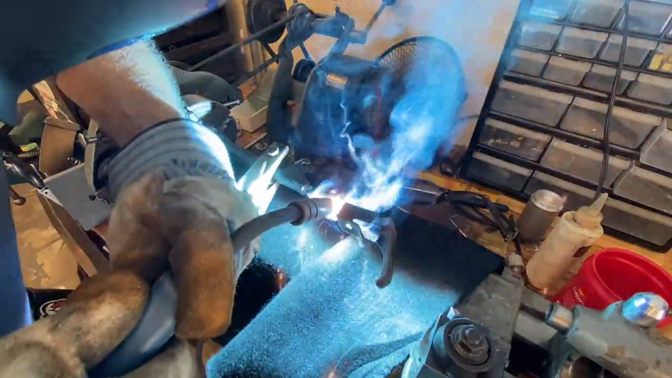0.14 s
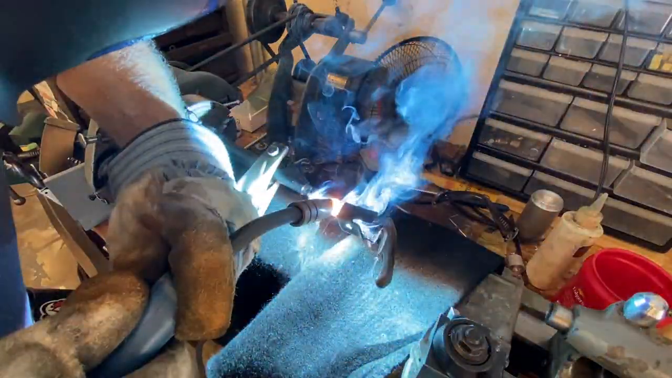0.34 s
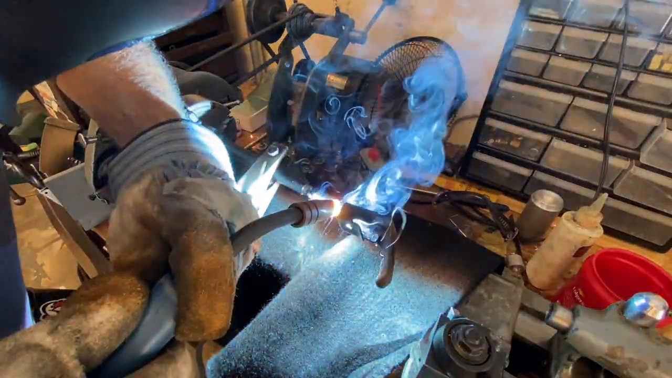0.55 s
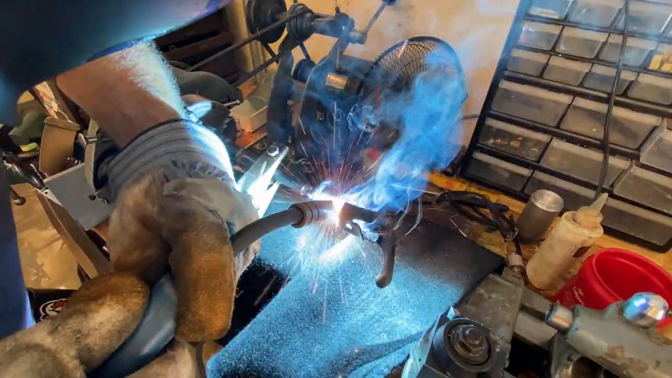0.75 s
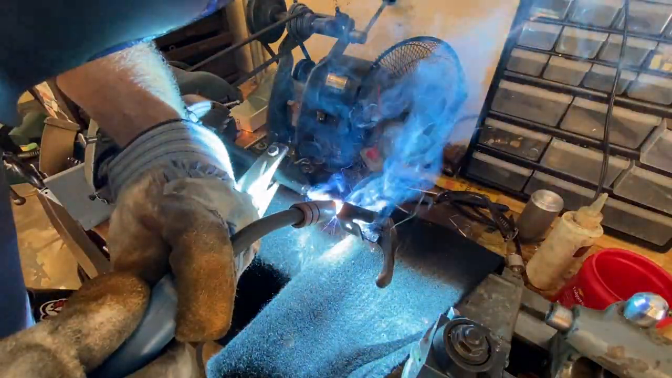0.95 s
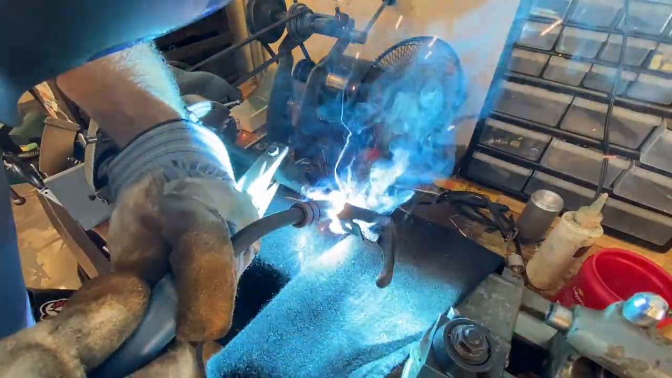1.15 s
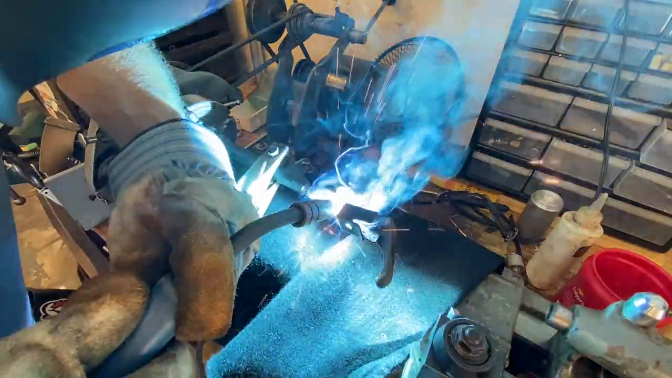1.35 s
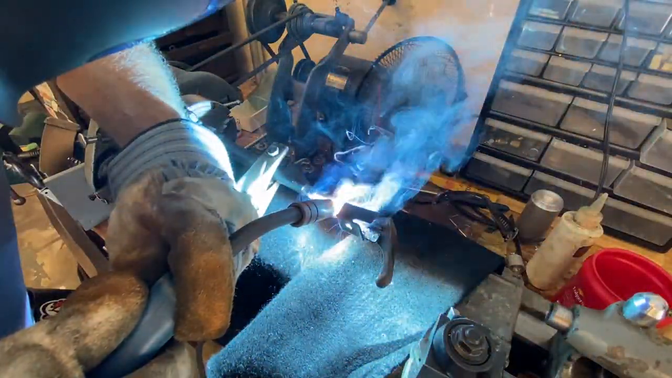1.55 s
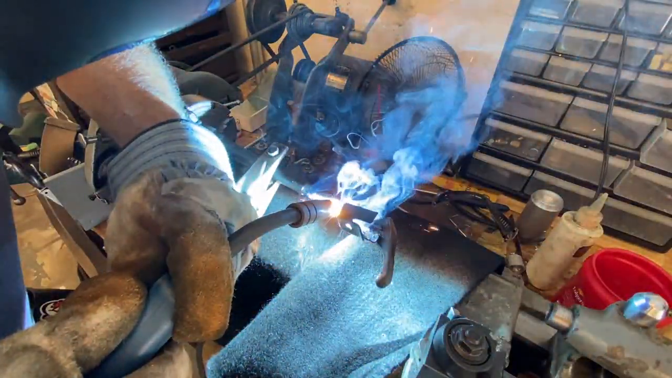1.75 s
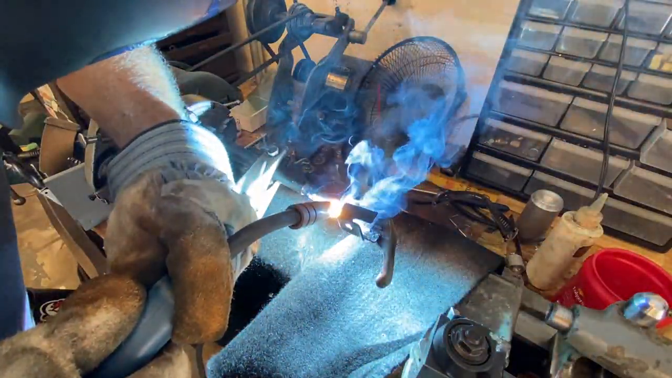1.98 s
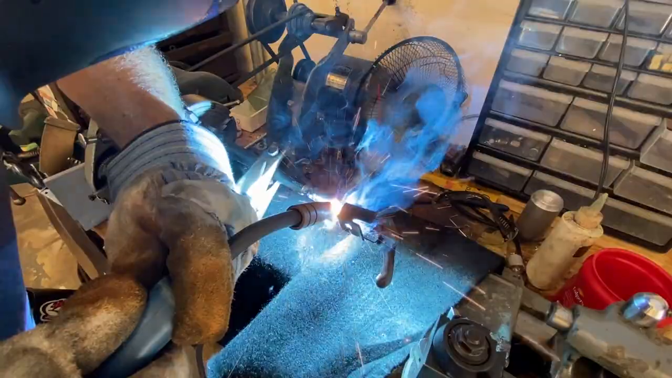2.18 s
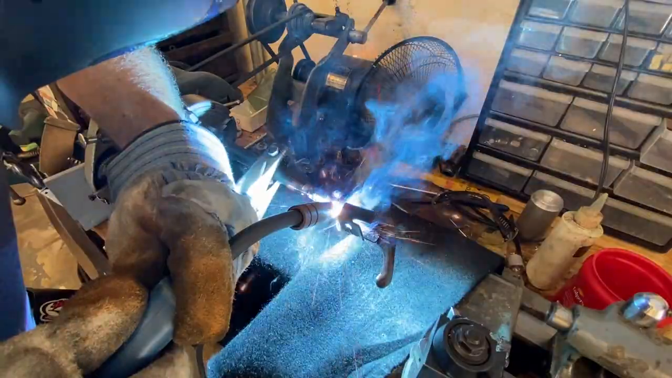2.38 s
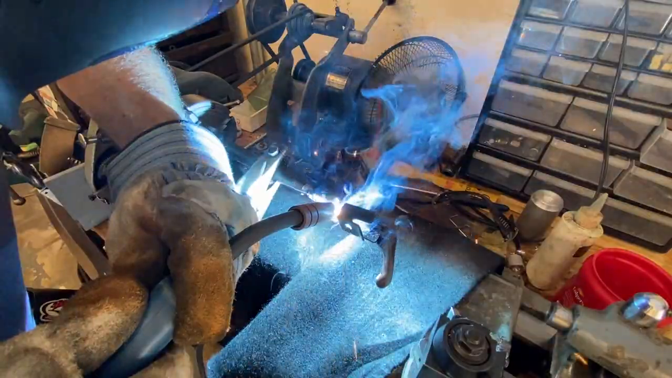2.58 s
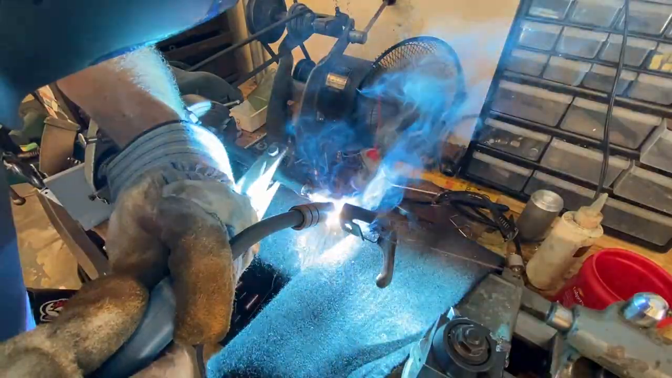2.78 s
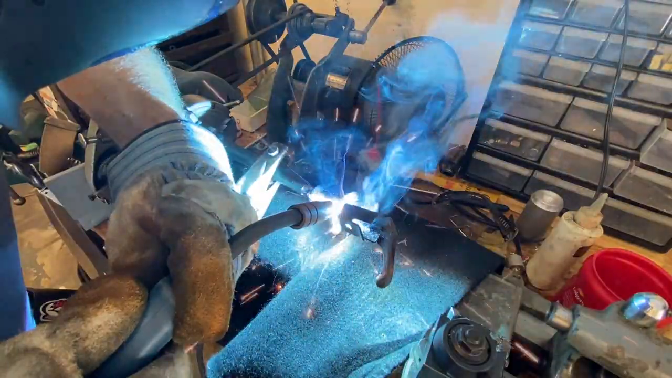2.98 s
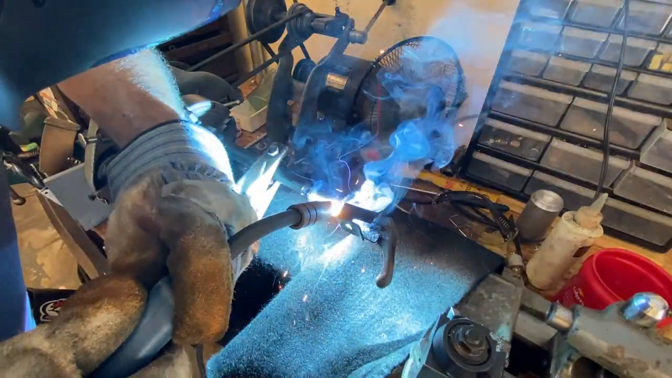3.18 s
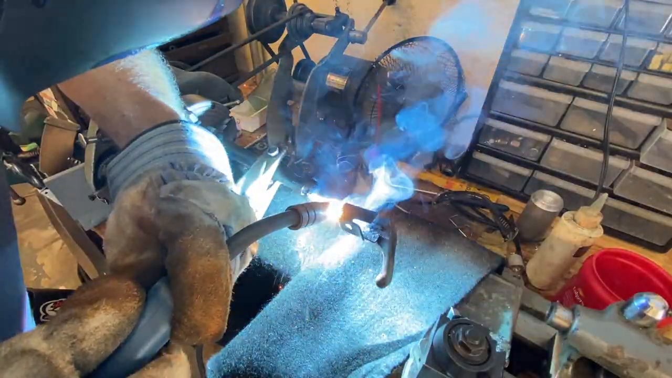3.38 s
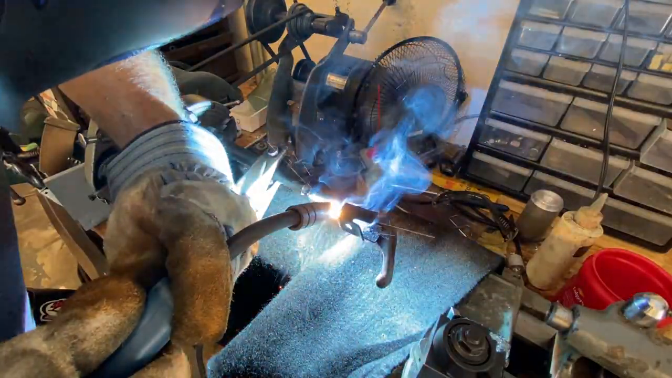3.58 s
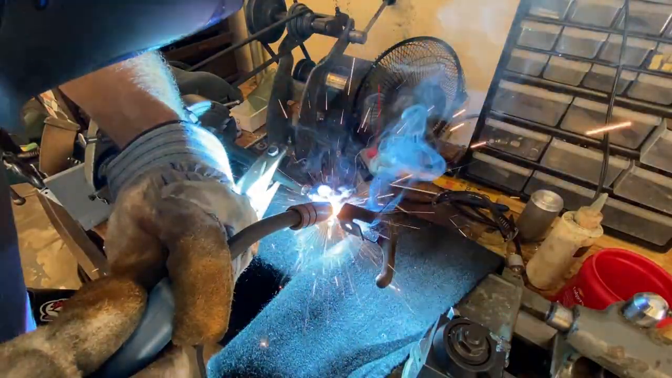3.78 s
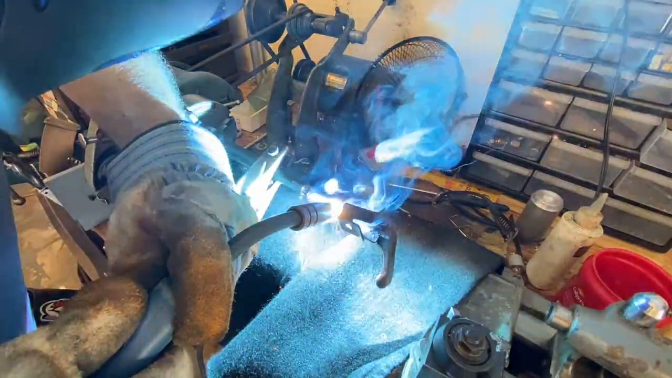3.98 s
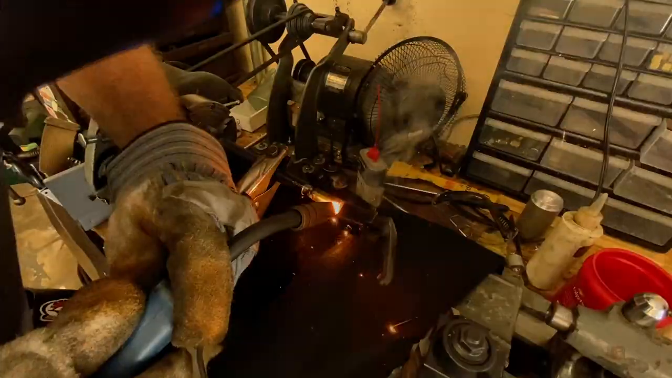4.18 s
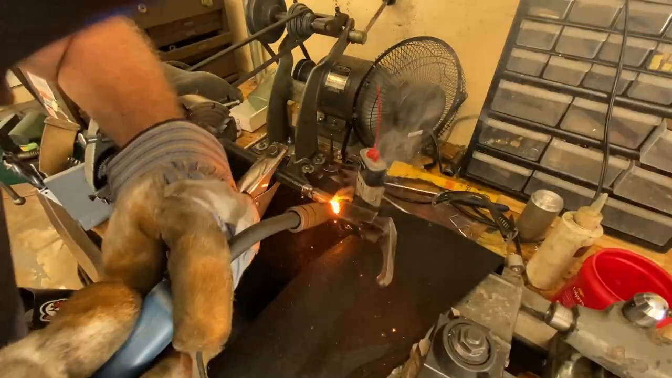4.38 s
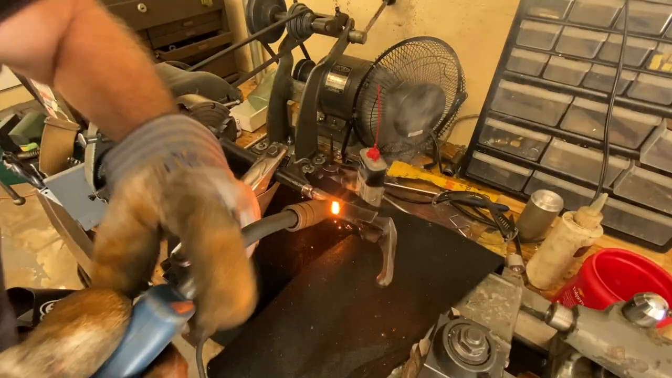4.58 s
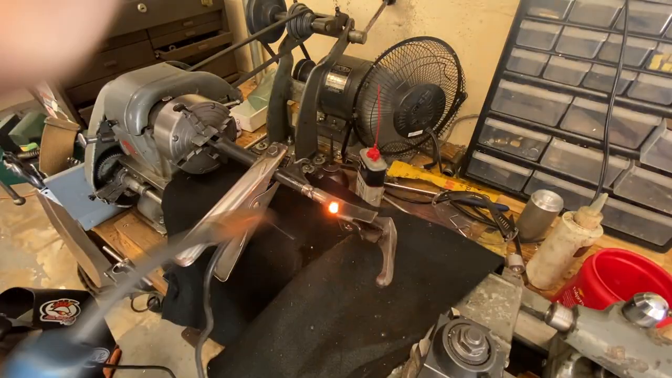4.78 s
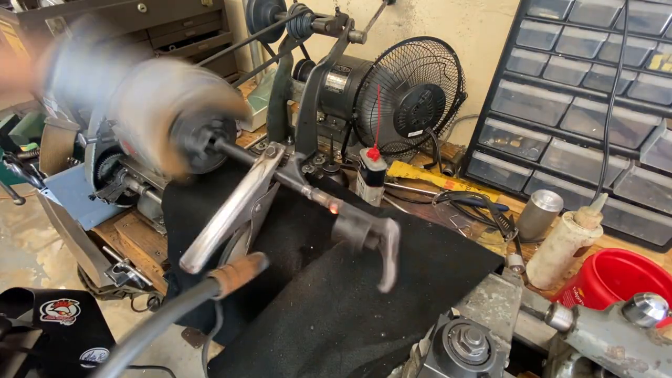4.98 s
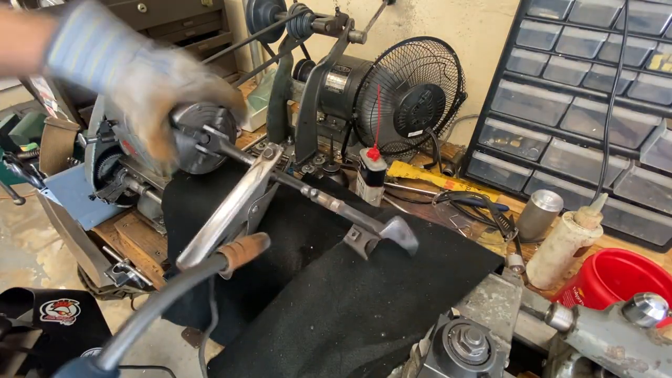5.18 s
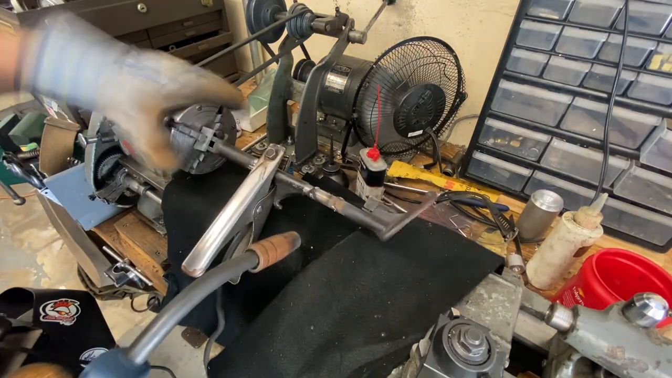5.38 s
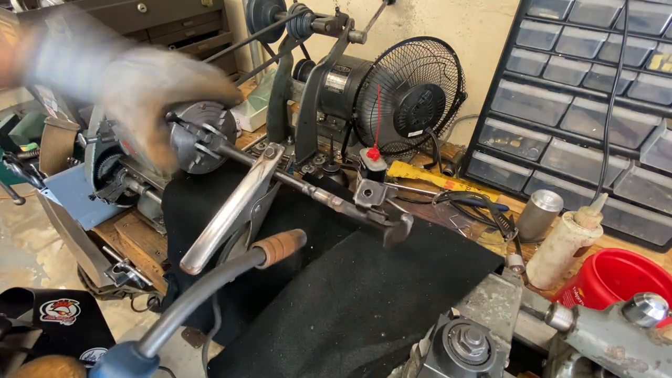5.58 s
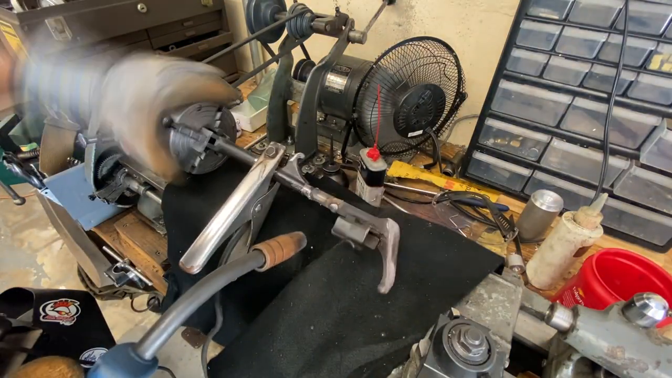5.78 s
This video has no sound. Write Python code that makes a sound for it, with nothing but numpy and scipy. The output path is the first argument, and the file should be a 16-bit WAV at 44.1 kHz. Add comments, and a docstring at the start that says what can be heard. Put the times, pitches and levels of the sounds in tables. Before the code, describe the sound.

Rapid, dry welding pops come in clusters, with airy sizzling and a low electrical groan under the heavier runs. The sound is thin in the bass, crisp and close, with short workshop reflections. After four seconds the welding cuts off, a rigid shell creaks briefly, then a faint hum and fan continue with tiny handling ticks.

```python
"""A small steel workshop, the microphone close to a MIG welder at work over a steady machine hum and a fan.
For about four seconds the wire keeps shorting and the arc relights, each time with a tick, a pop of hot gas
and a spit of metal; between pops the arc hisses, the stirred pool fries and the loaded welder groans.
The arc stops, and struck shell modes creak briefly (probably the helmet hinge).
The hum and the fan remain, with faint knocks of filtered noise as the work is turned."""
import sys
import numpy as np
from scipy import signal
from scipy.fft import rfft, irfft
from scipy.io import wavfile

SR = 44100
rng = np.random.default_rng(int(sys.argv[2]) if len(sys.argv) > 2 else 0)


def generate_wav(signal):
    """Clip the signal to [-1, 1] and save it as 16-bit WAV at the path in sys.argv[1]."""
    frames = np.transpose(np.atleast_2d(signal))
    scaled = np.clip(frames, -1, 1) * 32767
    pcm = np.round(scaled).astype(np.int16)
    wavfile.write(sys.argv[1], SR, pcm)


N = 257544  # length in samples

# hum of the idling machines ahead of the microphone's low cut: pitch_hz, level_db (rms)
HUM_TONES = [(125, -41.5), (250, -53.5), (354, -65.5), (454, -65)]
# spectrum of the fan's rush: pitch_hz, relative level_db (per Hz)
FAN_SPECTRUM = [(40, -33), (120, -15), (210, -4.5), (300, -11), (440, -11), (510, -16), (590, -15.5),
                (630, -16.5), (690, -11.5), (900, -21), (1400, -23), (2100, -34.5), (3700, -35),
                (4800, -44.5), (12500, -48.5), (16000, -65)]
FAN_DB = -53
# tones of the loaded welder: pitch_hz, relative level_db
GROAN_TONES = [(121, -33), (242, 4.5), (335, -15.5), (462, -11)]
# surges of current that make the welder groan: start_s, length_s, relative level_db
CURRENT_SURGES = [(.26, 0.12, -49), (.69, 0.13, -27), (1.03, 0.11, -36), (1.36, 0.22, -35.5),
                  (2.16, 0.22, -35.5), (2.72, 0.32, -29.5), (3.27, 0.13, -45.5), (3.68, .12, -28),
                  (4.02, 0.12, -34.5)]
SURGE_ATTACK_S, SURGE_RELEASE_S, STEADY_LOAD_DB = 0.04, 0.027, -59
# reverberation of the workshop: pitch_hz, t60_s
ROOM_DECAY = [(250, 0.59), (700, 0.35), (2000, 0.36), (6000, 0.65), (12000, .24), (16000, .18)]
# reflections from surfaces near the weld: delay_s, gain (linear)
NEAR_ECHOES = [(.0013, 0.39), (.0046, 0.33), (.0061, 0.26), (0.0099, .1), (0.0145, 0.04)]

# faint ticks as the work is turned by hand: start_s, level_db
HANDLING_TICKS = [(4.853, -66.5), (5.54, -66.5), (5.68, -69.5)]
# short stick-slip rubs: start_s, length_s, level_db, slip rate at the start_hz, slip rate at the end_hz
CREAK_RUBS = [(4.121, .021, -29, 460, 330), (4.166, .019, -30, 450, 250), (4.179, 0.026, -32, 268, 276),
              (4.222, 0.033, -32.5, 230, 276), (4.29, 0.03, -43, 170, 270)]
# resonances of the creaking shell: pitch_hz, relative level_db, t60_s
SHELL_MODES = [(547.4, -7.5, 0.17), (788, 4.5, 0.075), (1195, 3, 0.013), (1372, -3.5, 0.044),
               (1645, -10, 0.042), (1930, -2.5, 0.012), (2470, -18, 0.11), (3340, -0.5, 0.0064),
               (4170, -12, 0.006)]

# faint simmer of the short arc, then of the cooling bead: time_s, relative level_db
SIMMER_LEVEL = [(0.4, -55), (2.05, -54), (3.5, -65.5), (4.1, -63.5), (4.4, -90)]
# fine sparks that tick in the simmer; their level is relative to it
SPARKS_PER_S, SPARKS_DB, SPARKS_SPREAD_DB = 470, -4.5, 3.5
# spells in which the arc stands open and hisses: start_s, length_s, relative level_db
OPEN_ARC_SPELLS = [(0.0, 0.068, -27.5), (.1, 0.247, -37.5), (.535, 0.013, -38.5), (.585, 1.265, -33.5),
                   (1.145, 0.028, -28), (1.63, .19, -32), (1.892, 0.015, -38), (2.165, 0.15, -37),
                   (2.36, .19, -30.5), (2.56, .15, -42), (2.75, .29, -38), (3.09, 0.2, -47),
                   (3.675, 0.35, -32), (4.03, .06, -50), (4.068, 0.017, -45)]
HISS_ATTACK_S, HISS_RELEASE_S, ARC_OFF_S = 0.003, 0.012, 4.1
# spectrum of the arc hiss: pitch_hz, relative level_db (per Hz)
HISS_SPECTRUM = [(2000, -37.5), (3100, -37.5), (3600, -20.5), (4400, -35.5), (5600, -22.5), (6300, -33.5),
                 (6800, -7.5), (7800, -9.5), (8600, -11.5), (10200, -10.5), (11800, 1), (12800, -11),
                 (14000, -11), (15200, -23.5)]
# spectrum of the frying pool: pitch_hz, relative level_db (per Hz)
FRYING_SPECTRUM = [(100, -32), (190, -22.5), (245, -13), (370, -10), (680, 5), (1000, 0.5), (1450, -3),
                   (2100, -10.5), (3600, -7), (4800, -12.5), (5600, -6.5), (7000, -25), (14000, -15.5)]

# loud pops, each a relighting of the arc: start_s, gas knock relative level_db, metal spit relative level_db
LOUD_POPS = [(0.015, -23.5, -25.5), (0.057, -24.5, -29), (0.092, -26, -19.5), (0.098, -22, -20.5),
             (0.136, -15.5, -11.5), (0.179, -17.5, -15), (0.68, -8.5, -17), (0.695, -20, -23.5),
             (0.726, -9, -18.5), (0.74, -10.5, -18), (0.762, -18, -18.5), (0.773, -12, -20),
             (0.783, -11.5, -25), (0.804, -18, -16), (0.817, -9.5, -21.5), (0.826, -22, -19),
             (0.855, -10.5, -22), (0.865, -16.5, -20.5), (0.881, -18.5, -26.5), (0.976, -25, -20),
             (1.022, -27.5, -21), (1.052, -6.5, -9.5), (1.093, -6.5, -7.5), (1.209, -13.5, -13),
             (1.251, -13.5, -12), (1.361, -9, -7), (1.402, -7, -7.5), (1.446, -18.5, -19),
             (1.504, -18.5, -22.5), (1.545, -20, -23), (2.175, -8.5, -22), (2.216, -9, -22),
             (2.243, -12, -19), (2.256, -14.5, -19), (2.289, -13, -21.5), (2.302, -12.5, -18.5),
             (2.347, -16.5, -16), (2.389, -8, -8), (2.429, -8.5, -11), (2.461, -16.5, -19.5),
             (2.506, -17, -20.5), (2.564, -18, -23.5), (2.606, -17.5, -23.5), (2.648, -25, -30),
             (2.698, -4.5, -12.5), (2.738, -5.5, -11.5), (2.777, -9, -18.5), (2.82, -7.5, -17.5),
             (2.847, -10, -22), (2.86, -11.5, -22), (2.89, -8.5, -22), (2.902, -11, -20.5),
             (2.922, -10.5, -16.5), (2.938, -14, -22.5), (2.962, -11.5, -16), (2.979, -13.5, -17),
             (2.997, -16.5, -20.5), (3.039, -15, -18), (3.62, -27, -33), (3.665, -23.5, -28.5),
             (3.69, -11, -16.5), (3.729, -10, -16.5), (3.752, -18, -18.5), (3.77, -12.5, -17),
             (3.794, -16, -20.5), (3.812, -12.5, -16), (3.837, -15, -15.5), (3.858, -12.5, -16.5),
             (3.883, -14.5, -14.5), (3.899, -10, -15.5), (3.937, -9.5, -15.5), (3.971, -14.5, -22.5),
             (4.013, -14.5, -20.5)]
# spectrum of the crack: pitch_hz, relative level_db (per Hz)
CRACK_SPECTRUM = [(40, -28.5), (160, -40.5), (260, 4), (1500, 3), (2100, -9), (2700, 2.5), (3050, -5),
                  (3450, 7.5), (4000, -1.5), (4900, -4), (5700, -6.5), (7000, -9.5), (12000, -16)]
# spectrum of the spitting metal: pitch_hz, relative level_db (per Hz)
SPIT_SPECTRUM = [(1500, -26), (3500, -9), (6100, -13.5), (7300, -3), (8700, -5.5), (9900, -4.5),
                 (11000, -2.5), (12100, 2), (12900, -8), (14000, -11), (15200, -37), (16000, -28.5)]
# deep modes of the bench: pitch_hz, relative level_db, t60_s
BENCH_MODES = [(250.6, -9.5, 0.11), (294, -8.5, 0.071), (350, 1, 0.04), (457.3, -0.5, 0.057),
               (497, 3, 0.04)]
# quick resonances of the work and the tools around it: pitch_hz, relative level_db, t60_s
WORK_MODES = [(601, -18.5, 0.02), (692, 3.5, 0.032), (735, 4, 0.039), (791, -8.5, 0.019), (854.4, 3, 0.031),
              (1169.4, -7.5, 0.11), (1417, -5, 0.079), (1518.2, -27, 0.021), (1570, -15, 0.047)]
# the wire touches the pool with a tick just before it bursts; the tick is stronger before a spitting pop
TOUCH_LEAD_S, TOUCH_DB, TOUCH_PER_SPIT = 0.0065, -18, 0.82
# small pops at random while the pool is stirred; the rate is for a stir of 1
SPATTER_PER_S, SPATTER_KNOCK_DB, SPATTER_SPIT_DB, SPATTER_SPREAD_DB = 26, -33.5, -28.5, 3
# the bench booms more under dull pops and in dense runs
BOOM_DB, BOOM_PER_DULLNESS, BOOM_STIR_DB = -24, 0.67, 3.5
# each pop stirs the pool, the more the harder it spits; the pool answers late and settles again
STIR_S, FULL_STIR_DB, STIR_GROWTH = 0.029, -15.5, 0.4

WELD_DELAY_S = 0.25 / 343  # the weld starts a fraction of a millisecond after its listed times
LOW_CUT_HZ, PORT_NOTCH_HZ, EDGE_HZ = 270.8, 9590, 16000  # the microphone's low cut, treble dip and top edge


def amp(db):
    """Linear gain of a level in dB."""
    return 10 ** (np.asarray(db) / 20)


def unit(x):
    """Scales a sound to rms 1."""
    return x / np.sqrt(np.mean(x ** 2) + 1e-20)


def punch(x, size=441):
    """Scales a hit to rms 1 over its first samples, by default a hundredth of a second."""
    return x / np.sqrt(np.sum(x[:size] ** 2) / size + 1e-20)


def read(points, hz):
    """Reads a curve between its points, on a log frequency scale."""
    f, value = np.transpose(points)
    return np.interp(np.log(hz + 1), np.log(f + 1), value)


def add(mix, s, sound):
    """Lays a sound into the mix from s seconds on, cut off at the end of the mix."""
    part = mix[max(round(s * SR), 0):][:len(sound)]
    part += sound[:len(part)]


def wander(hz):
    """Slow random drift of rms 1, fading out above hz."""
    hz_axis = np.fft.rfftfreq(N, 1 / SR)
    spectrum = rfft(rng.standard_normal(N)) / (1 + (hz_axis / hz) ** 4)
    return unit(irfft(spectrum, N))


def colour(x, points, size=2048):
    """Causal minimum-phase filter with the given spectrum."""
    hz = abs(np.fft.fftfreq(size, 1 / SR))
    log_gain = np.log(amp(read(points, hz)))
    taps = np.fft.ifft(np.exp(np.conj(signal.hilbert(log_gain)))).real
    return signal.fftconvolve(x, taps[:size // 2])[:len(x)]


def ring(modes, t):
    """Damped sines struck together."""
    return sum(amp(db - 60 * t / t60) * np.sin(2 * np.pi * hz * t) for hz, db, t60 in modes)


def spells(rows, attack_s, release_s):
    """Strength of overlapping spells that each rise, hold and die away; their powers add."""
    t, power = np.arange(N) / SR, np.zeros(N)
    for s, length, db in rows:
        rise = 1 - np.exp(-np.maximum(t - s, 0) / attack_s)
        fall = np.exp(-np.maximum(t - s - length, 0) / release_s)
        power += (amp(db) * rise * fall) ** 2
    return np.sqrt(power)


def tones(lines, waver, waver_hz, sway):
    """Steady tones that drift a little in phase (waver, radians) and strength (sway, share)."""
    t, out = np.arange(N) / SR, np.zeros(N)
    for hz, db in lines:
        strength = 1 + sway * wander(waver_hz)
        phase = 2 * np.pi * hz * t + waver * wander(waver_hz)
        out += amp(db) * unit(strength * np.sin(phase))
    return out


def machines(load_db=-3, gust_db=0.14, gust_hz=7):
    """The welder groans under load; a wavering hum and the rush of a fan go on throughout."""
    surges = spells(CURRENT_SURGES, SURGE_ATTACK_S, SURGE_RELEASE_S)
    steady = spells([(0.0065, ARC_OFF_S, STEADY_LOAD_DB)], SURGE_ATTACK_S, SURGE_RELEASE_S)
    groan = amp(load_db) * (steady + surges) * tones(GROAN_TONES, waver=0.84, waver_hz=18, sway=0.25)
    hum = tones(HUM_TONES, waver=0.34, waver_hz=5.2, sway=0.22)
    rush = unit(colour(rng.standard_normal(N), FAN_SPECTRUM))
    fan = amp(FAN_DB + gust_db * wander(gust_hz)) * rush
    return groan + hum + fan


def workshop(x, clutter_db=-8, clutter_s=0.0082, tail_db=-17.5, build_s=0.0016):
    """Quick treble scatter off the clutter, then a tail in which each band dies at its own rate."""
    t = np.arange(SR * 2 // 3) / SR
    # sparse reflections of random sign that build up from silence
    signs = rng.choice([-1, 1], (2, len(t)))
    sparse = rng.random((2, len(t))) < 0.12
    tail_hits, clutter_hits = signs * sparse * (1 - np.exp(-t / build_s))
    hz, frame_s, bands = signal.stft(tail_hits, SR, nperseg=256)
    decay = amp(-60 * frame_s / read(ROOM_DECAY, hz)[:, None])
    tail = signal.istft(bands * decay, SR)[1][:len(t)]
    treble_only = signal.butter(3, 2800, "high", fs=SR, output="sos")
    clutter = signal.sosfilt(treble_only, clutter_hits * np.exp(-t / clutter_s))
    response = amp(tail_db) * tail / np.linalg.norm(tail)
    response += amp(clutter_db) * clutter / np.linalg.norm(clutter)
    return signal.fftconvolve(x, response)[:N]


def echoed(x):
    """Adds the first reflections from the bench and the tools on it."""
    out = x.copy()
    for delay, gain in NEAR_ECHOES:
        add(out, delay, gain * x)
    return out


def handling(tick_s=0.0042):
    """Small knocks of the clamped steel: short decaying noise with the spectrum of the crack."""
    t, out = np.arange(SR // 16) / SR, np.zeros(N)
    for s, db in HANDLING_TICKS:
        burst = rng.standard_normal(len(t)) * np.exp(-t / tick_s)
        add(out, s, amp(db) * punch(colour(burst, CRACK_SPECTRUM)))
    return out


def creak(jitter=0.18, scrape=0.11, top_hz=4700):
    """Uneven slips of a hinge ring a stiff shell that carries little treble."""
    out, shell = np.zeros(N), ring(SHELL_MODES, np.arange(SR // 16) / SR)
    for s, length, db, start_hz, end_hz in CREAK_RUBS:
        n = int(length * SR)
        turns = np.cumsum(np.linspace(start_hz, end_hz, n)) / SR
        slips = np.diff(np.floor(turns), prepend=-1)  # one impulse a slip
        slips = slips * (1 + jitter * rng.standard_normal(n))
        sound = signal.fftconvolve(slips + scrape * rng.standard_normal(n), shell)
        add(out, s, amp(db) * punch(sound, size=n))
    # 40 dB down from top_hz / 0.8 upwards
    return signal.sosfilt(signal.cheby2(6, 40, top_hz / 0.8, fs=SR, output="sos"), out)


def simmer():
    """Strength of the faint sizzle that goes on between the louder spells."""
    return amp(np.interp(np.arange(N) / SR, *np.transpose(SIMMER_LEVEL), right=-100))


def sparks():
    """Tiny bursts of flying metal, of very unequal size; the last ones go off after the arc is out."""
    size_db = SPARKS_SPREAD_DB * np.minimum(rng.exponential(1, N), 4)
    bursts = amp(size_db) * (rng.random(N) < SPARKS_PER_S / SR)
    return amp(SPARKS_DB) * simmer() * unit(colour(echoed(bursts), SPIT_SPECTRUM))


def stirring():
    """Unrest of the weld pool: about 1 in a regular run of pops, more in a dense one."""
    kicks, age = np.zeros(N), np.arange(SR) / SR / STIR_S
    for s, _, metal_db in LOUD_POPS:
        add(kicks, s, [amp(STIR_GROWTH * (metal_db - FULL_STIR_DB))])
    return abs(signal.fftconvolve(kicks, age * np.exp(-age))[:N])


def burning(fade_s=0.08):
    """Full strength while the arc is lit, dying away once the trigger is let go."""
    return np.exp(-np.maximum(np.arange(N) / SR - ARC_OFF_S, 0) / fade_s)


def arc(stir, hiss_db=-1.5, frying_db=-40, frying_growth=0.8, fanning_db=-4,
        hiss_flutter_db=4.0, frying_flutter_db=6.0, flutter_hz=60, grain=0.42):
    """Countless tiny discharges flutter with the arc's length; the stirred pool fries, more under an open arc."""
    flutter = np.tanh(wander(flutter_hz))
    hiss_noise, frying_noise, roughness = rng.standard_normal((3, N))
    grains = np.exp(grain * roughness)  # makes the discharges unequal
    hiss = unit(colour(hiss_noise * grains * amp(hiss_flutter_db * flutter), HISS_SPECTRUM))
    frying = unit(colour(frying_noise * grains * amp(frying_flutter_db * flutter), FRYING_SPECTRUM))
    opening = np.hypot(spells(OPEN_ARC_SPELLS, HISS_ATTACK_S, HISS_RELEASE_S), simmer())
    heat = amp(frying_db) * stir ** frying_growth
    heat += amp(fanning_db) * opening * np.tanh(2 * stir)
    return amp(hiss_db) * opening * hiss + heat * frying


def shock(t, shock_db=3, shock_s=0.00012, lag_s=0.0003):
    """The short pressure spike of the gas as it is heated all at once."""
    u = np.maximum(t - lag_s, 0) / shock_s
    return -amp(shock_db) * (t > lag_s) * (1 - u) * np.exp(-u)


def pop(gas_db, metal_db, stir, knock_db=-6.5, crack_db=-7.5, spit_db=-3, crack_s=0.0026, spit_s=0.0024,
        swell_s=0.00049, snap=5, ragged=0.86, detune=0.012, gas_share=0.56):
    """The gas expands with a crack and a knock, the bench booms, and the bursting bridge of metal spits."""
    t = np.arange(SR // 5) / SR
    front = -snap * (t == 0)  # the steep pressure front that leads each crack
    crack_noise, spit_noise, roughness = rng.standard_normal((3, len(t)))
    stretch = 1 + detune * rng.standard_normal()  # no two pops ring quite alike
    boom = punch(-ring(BENCH_MODES, t * stretch))
    knock = punch(echoed(-ring(WORK_MODES, t * stretch)))
    crack = punch(echoed(colour(front + crack_noise * np.exp(-t / crack_s), CRACK_SPECTRUM)))
    spray = spit_noise * np.exp(ragged * roughness - t / spit_s) * (1 - np.exp(-t / swell_s))
    spit = punch(colour(spray, SPIT_SPECTRUM))
    dullness_db = gas_db - metal_db
    boom_level = gas_db + BOOM_DB + BOOM_PER_DULLNESS * dullness_db + BOOM_STIR_DB * stir
    crack_level = metal_db + gas_share * dullness_db  # the crack follows both the gas and the metal
    body = amp(boom_level) * boom + amp(gas_db + knock_db) * knock
    snap_and_crack = amp(crack_level) * (shock(t) + amp(crack_db) * crack)
    return body + snap_and_crack + amp(metal_db + spit_db) * spit


def spatter(stir, count=6):
    """Small pops of a few kinds fall at random, more often and harder the more the pool is stirred."""
    out = np.zeros(N)
    for _ in range(count):
        struck = rng.random(N) < stir * SPATTER_PER_S / count / SR
        hits = struck * amp(SPATTER_SPREAD_DB * rng.uniform(-1, 1, N))
        small_pop = pop(SPATTER_KNOCK_DB, SPATTER_SPIT_DB, 1)
        out += signal.oaconvolve(hits * np.tanh(stir), small_pop)[:N]
    return out


def pops(stir):
    """Each loud pop, led by the tick of the wire touching the pool."""
    out = np.zeros(N)
    for s, gas_db, metal_db in LOUD_POPS:
        touch_db = min(TOUCH_DB + TOUCH_PER_SPIT * (metal_db - gas_db), -6)  # relative to the pop
        add(out, s - TOUCH_LEAD_S, pop(gas_db + touch_db, metal_db + touch_db, 0))
        add(out, s, pop(gas_db, metal_db, stir[round(s * SR)]))
    return out


def scene(hinge_room_db=-4):
    """The weld, the creak and the handling sound in the workshop, over the machines."""
    stir, work, hinge = stirring(), sparks() + handling(), creak()
    weld = pops(stir) + burning() * (spatter(stir) + arc(stir))
    add(work, WELD_DELAY_S, weld)
    room = workshop(work + amp(hinge_room_db) * hinge)
    return (work + hinge + room + machines())[None]


def record(dry, ceiling=0.67, notch_q=9, notch_depth=0.57, unfiltered_db=-38):
    """The microphone cuts the lows and dips in the treble; the loudest pops overload softly; the band ends."""
    low_cut = signal.butter(7, LOW_CUT_HZ, "high", fs=SR, output="sos")
    thin = signal.sosfilt(low_cut, dry)
    # a very faint share of the unfiltered sound stays under the filtered one
    thin = thin + amp(unfiltered_db) * dry
    notched = signal.lfilter(*signal.iirnotch(PORT_NOTCH_HZ, notch_q, SR), thin)
    dipped = thin + notch_depth * (notched - thin)
    squashed = ceiling * np.tanh(dipped / ceiling)
    centred = signal.lfilter(*signal.butter(1, 60, "high", fs=SR), squashed)  # removes any offset
    band_edge = signal.firwin(301, EDGE_HZ, window=("kaiser", 9), fs=SR)
    return signal.oaconvolve(centred, band_edge[None], "same")


dry = scene()
out = record(dry)
generate_wav(out)
```